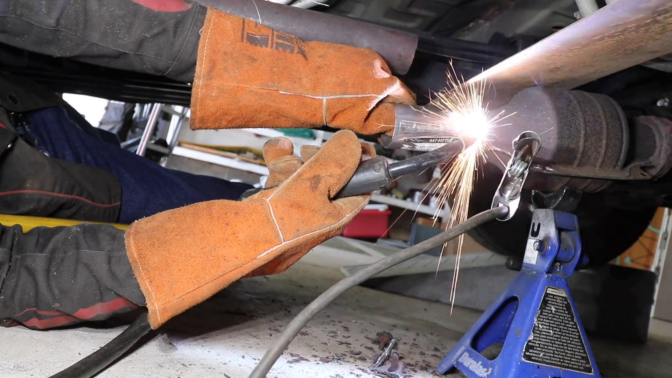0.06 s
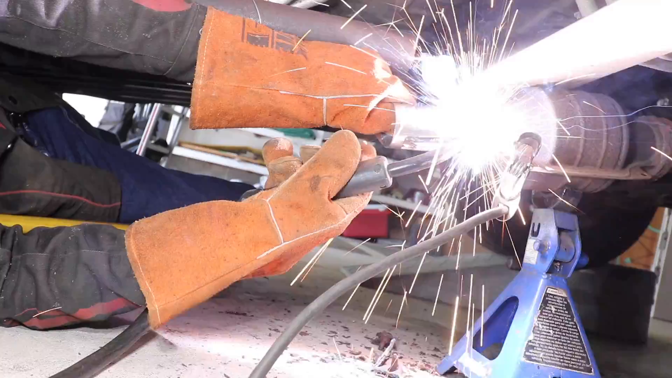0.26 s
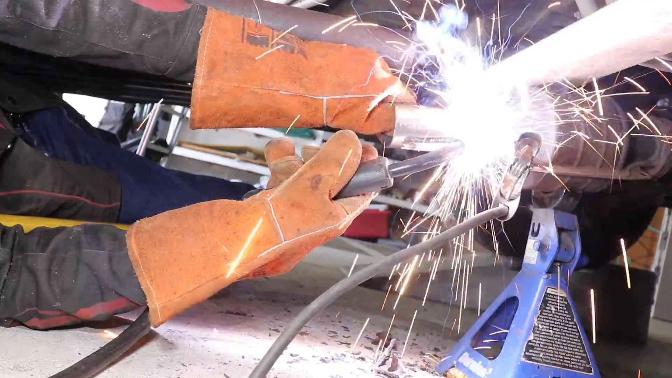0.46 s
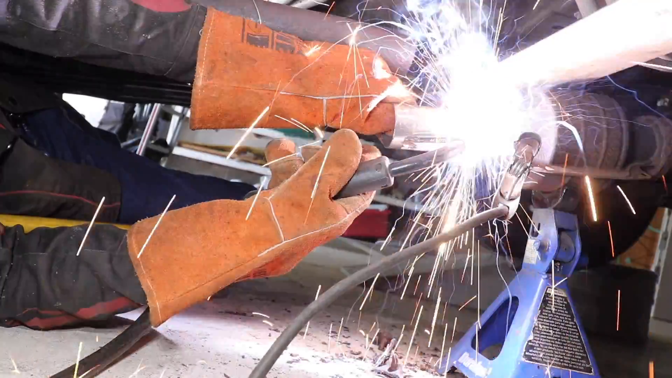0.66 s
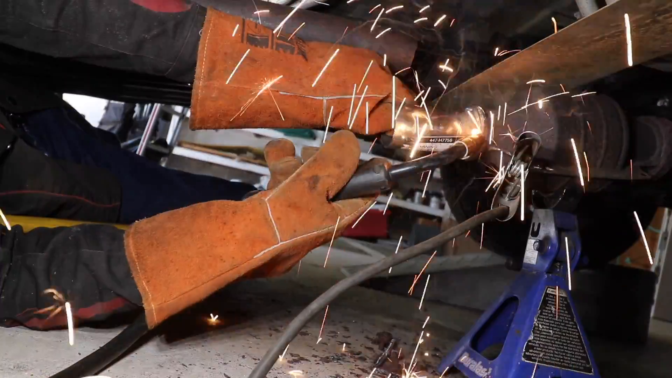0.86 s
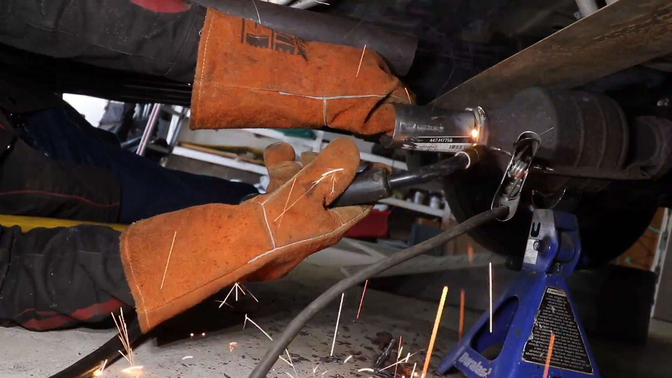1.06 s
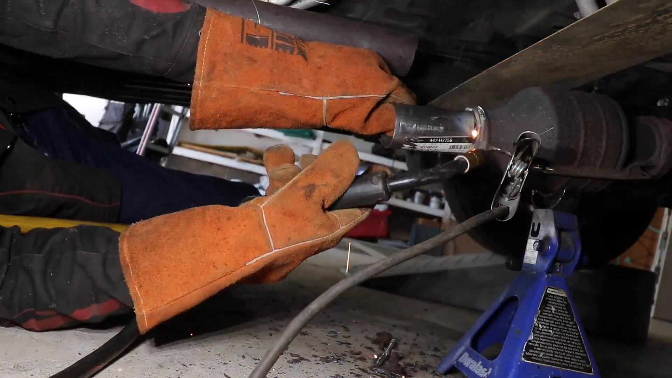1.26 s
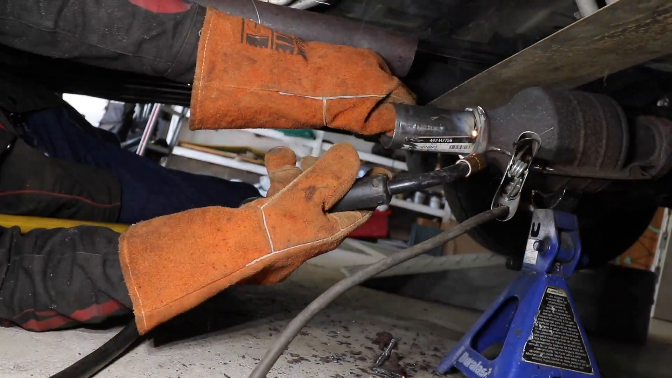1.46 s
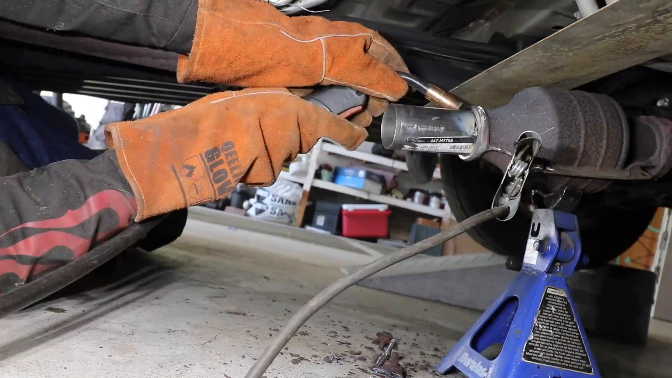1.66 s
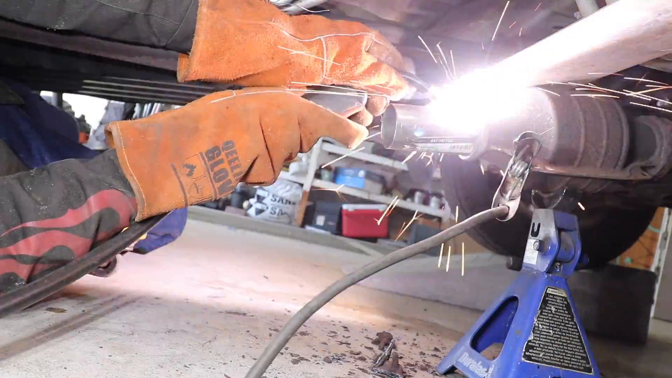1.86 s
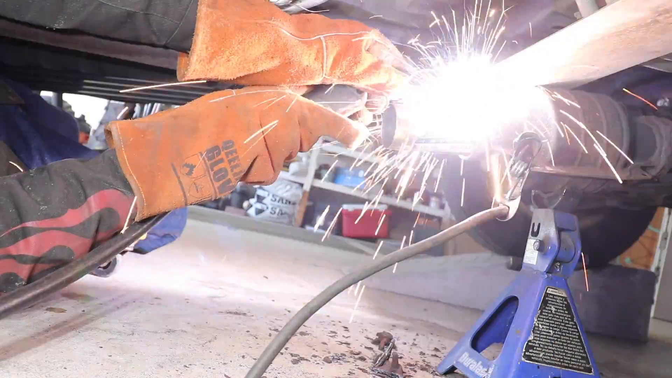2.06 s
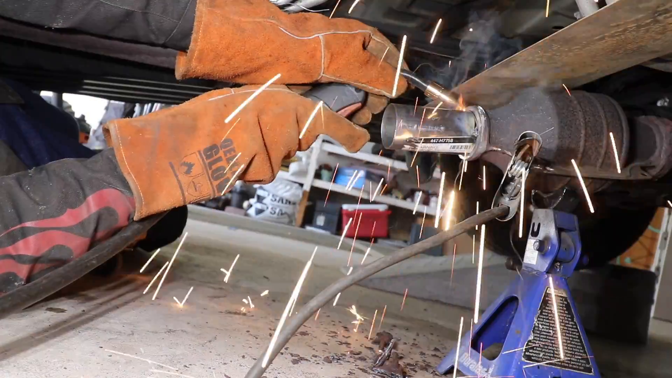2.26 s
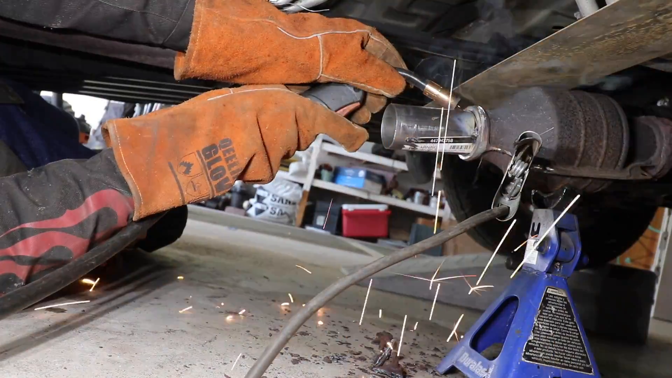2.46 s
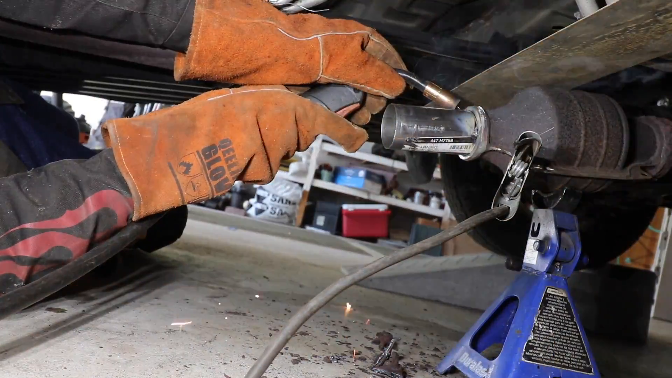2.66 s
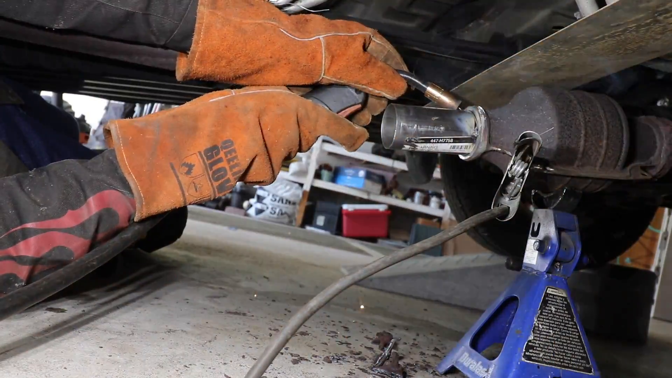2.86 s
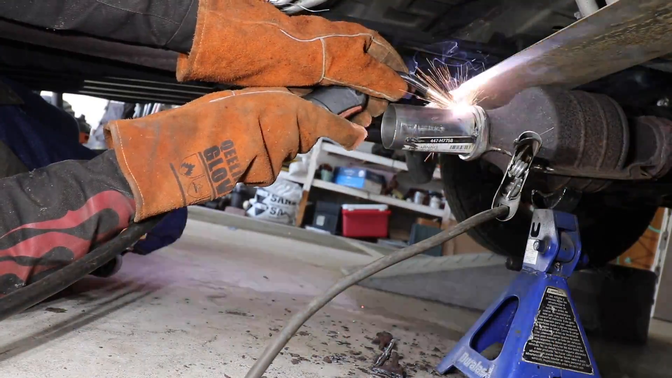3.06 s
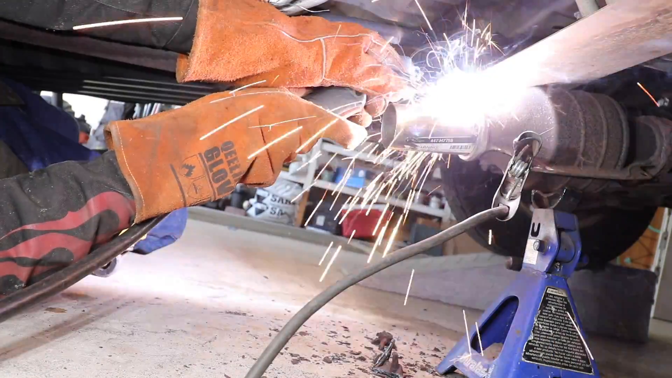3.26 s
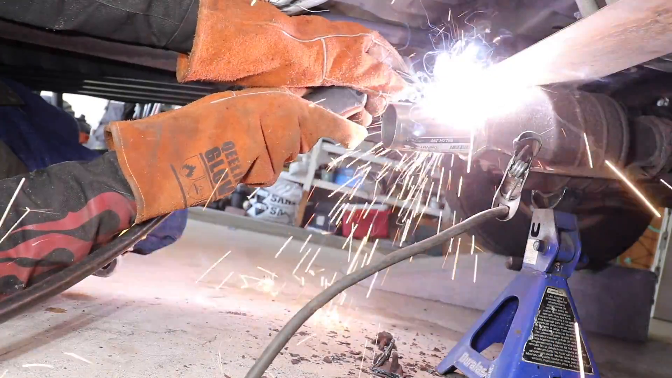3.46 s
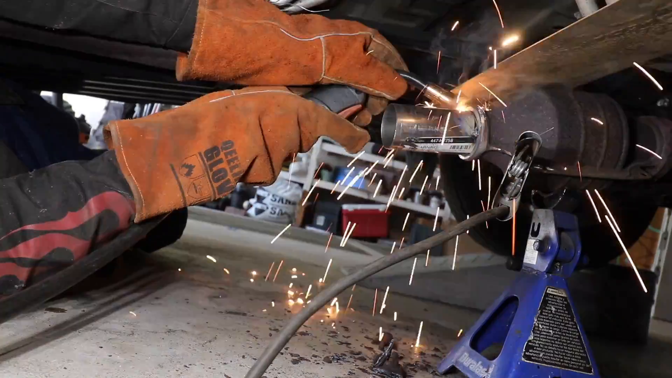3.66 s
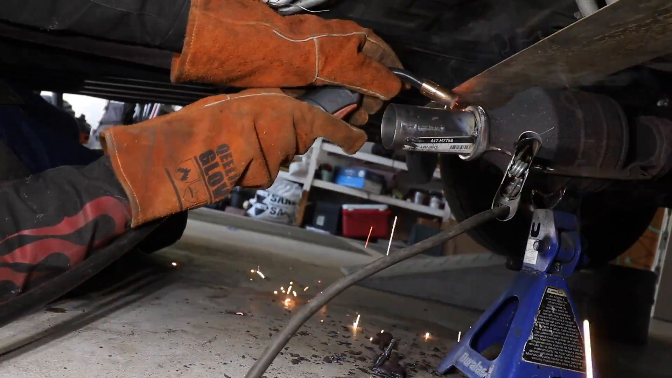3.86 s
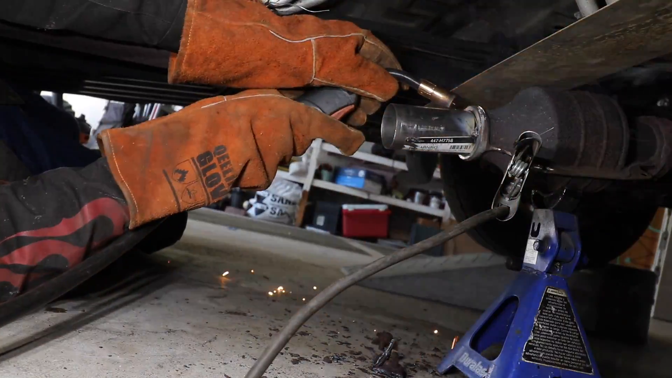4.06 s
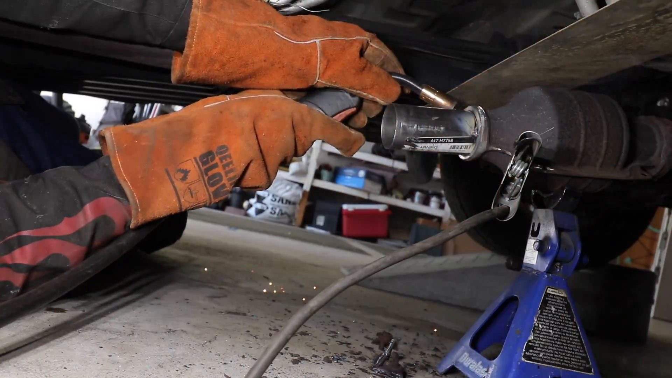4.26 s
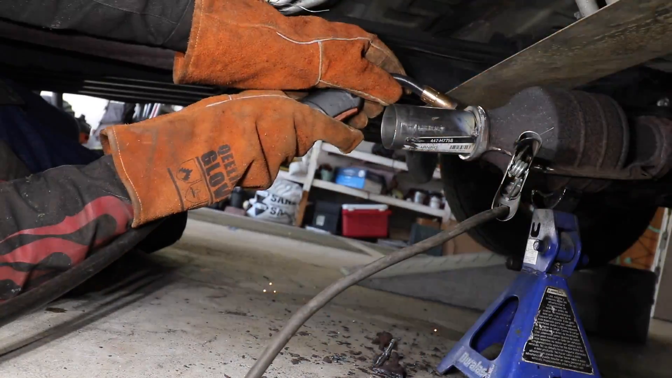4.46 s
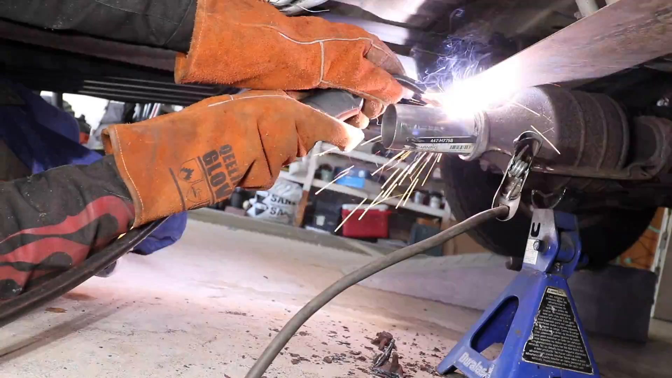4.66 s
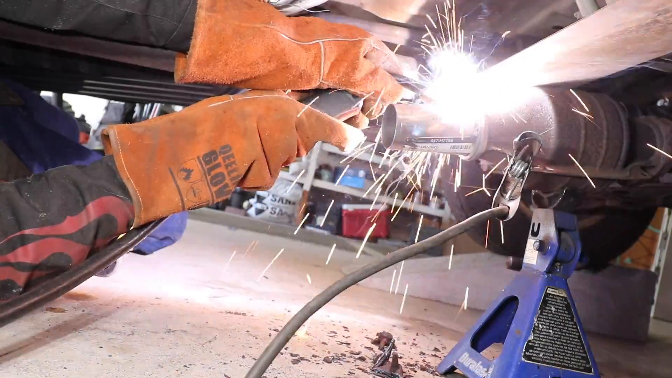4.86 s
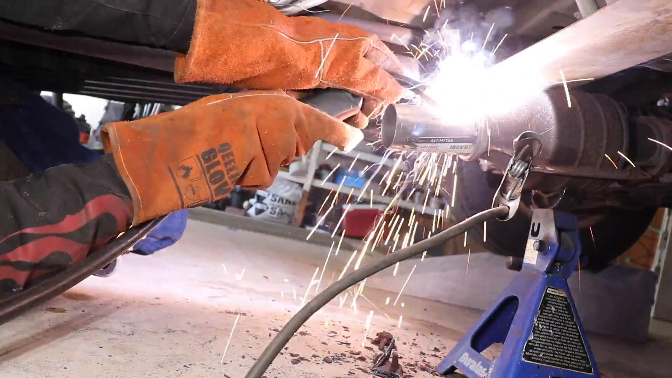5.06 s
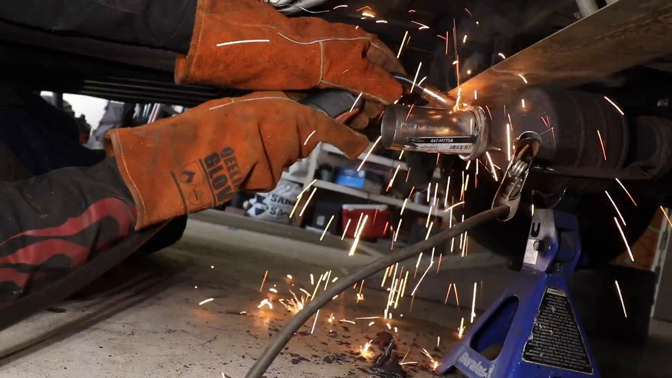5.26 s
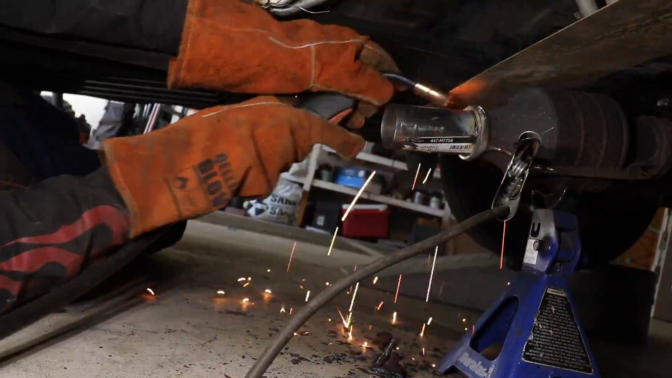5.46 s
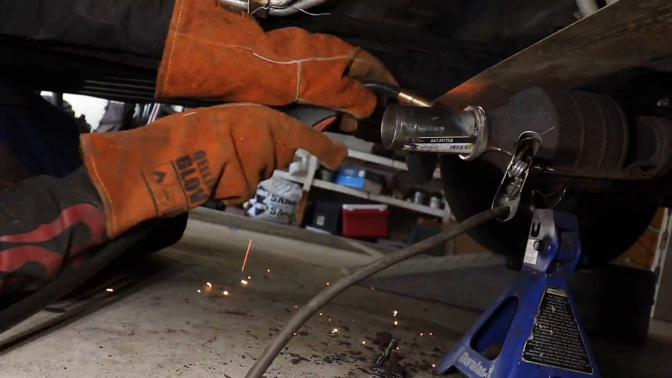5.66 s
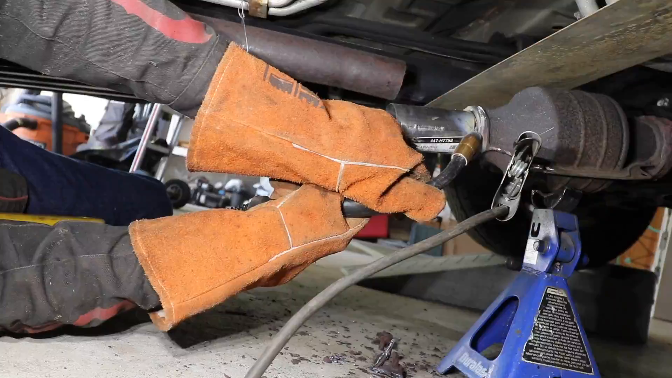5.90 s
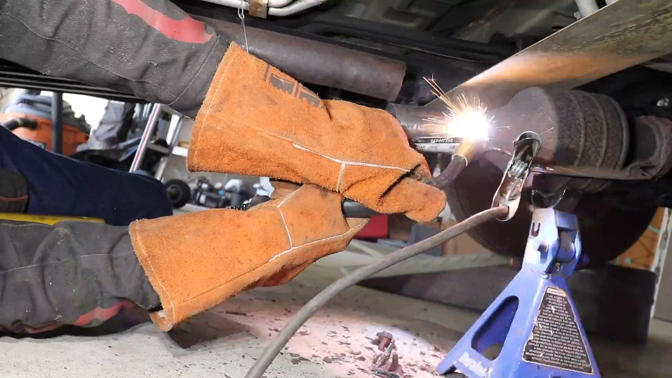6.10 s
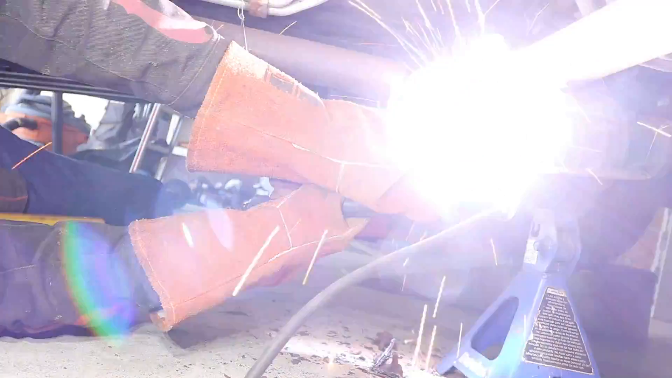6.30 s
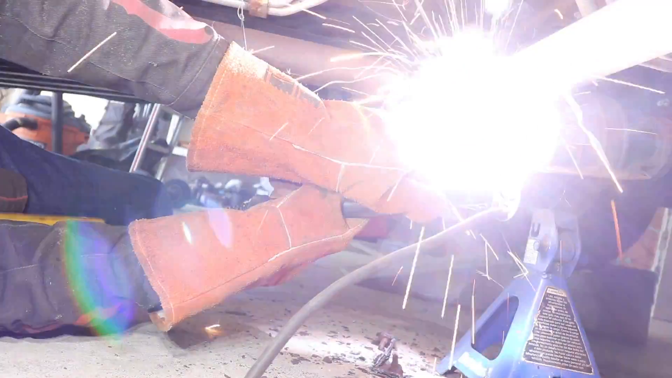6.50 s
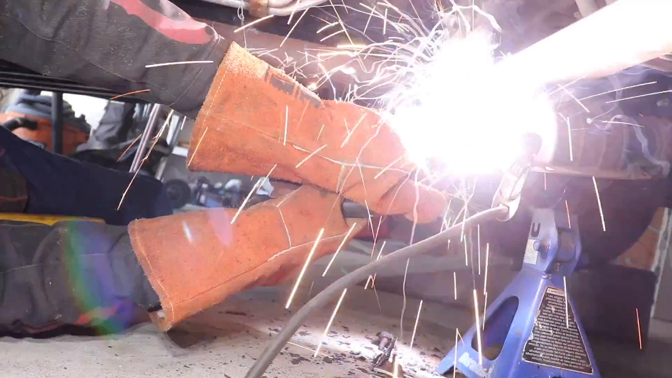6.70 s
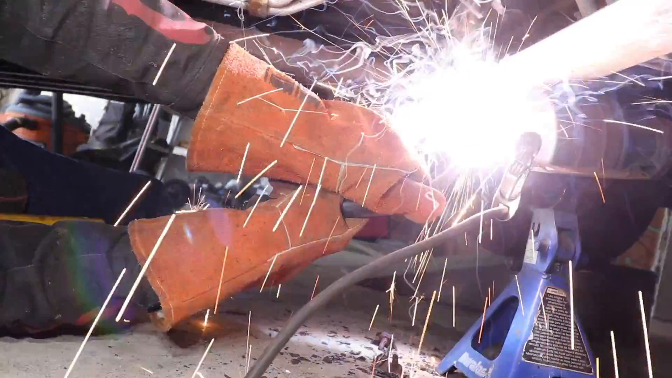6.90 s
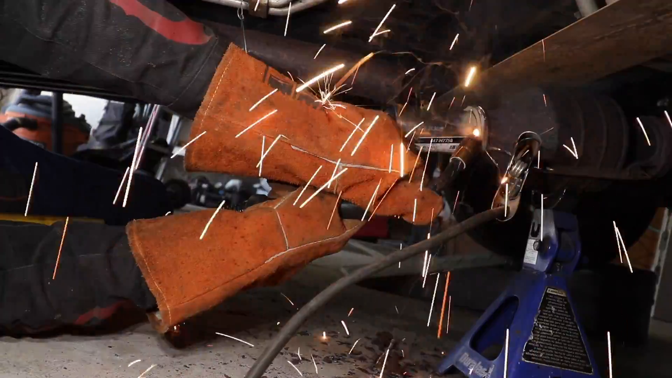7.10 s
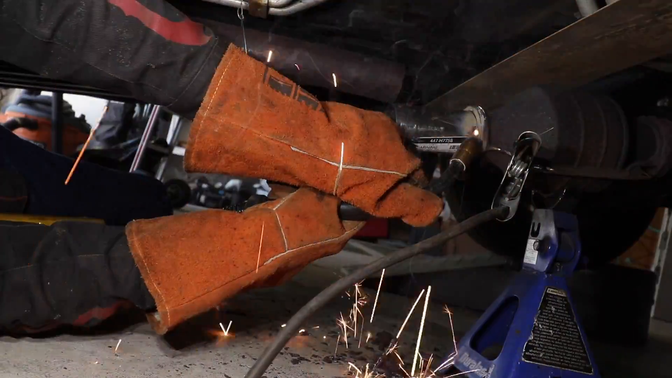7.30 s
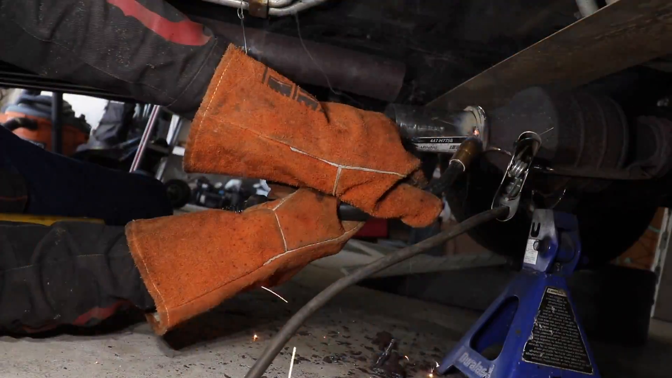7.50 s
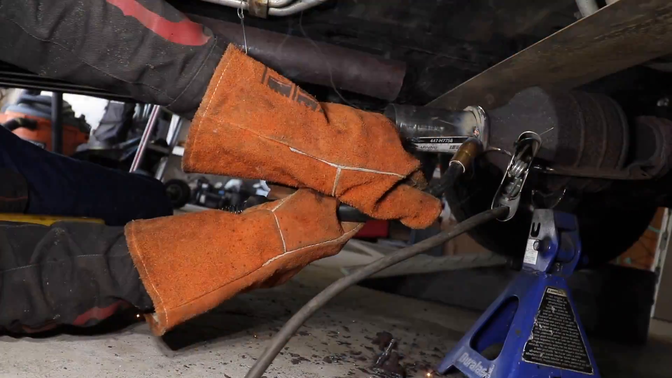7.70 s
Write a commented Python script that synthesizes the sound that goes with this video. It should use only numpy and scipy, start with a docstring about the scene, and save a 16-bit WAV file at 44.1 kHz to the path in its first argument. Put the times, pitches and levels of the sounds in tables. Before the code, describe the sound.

A welder's fan hums and a motor rumbles low in a garage. Five times the wire scratches on steel and an arc catches, with a bright, loud sizzle and snapping spits close to the microphone. The hum ducks under every burst and returns in the pauses, along with soft hiss and a few dry ticks. A light clank on the pipe follows the fourth weld. The space sounds tight, with little echo.

```python
"""A wire-feed welder tacks an exhaust pipe under a car, close by: five short arcs strike, spit and sizzle.
The wire scratches on cold steel, the arc fries in tiny bursts, and drops of metal short out and pop.
Between arcs, spatter ticks, hot metal fizzes and the torch knocks the pipe. Behind it all the welder's
fan hums and rushes and a motor rumbles in the garage; this backdrop dips at every strike and swells back."""
import sys
import numpy as np
from scipy import signal
from scipy.fft import rfft, irfft, next_fast_len
from scipy.io import wavfile
from scipy.ndimage import uniform_filter1d, map_coordinates

SR = 44100
rng = np.random.default_rng(int(sys.argv[2]) if len(sys.argv) > 2 else 0)


def unload_wav(signal):
    """Save mono or channel-first audio to the path in sys.argv[1] as 16-bit WAV at rate SR, clipped to [-1, 1]."""
    wavfile.write(
        sys.argv[1],
        SR,
        np.round(np.clip(np.atleast_2d(signal).T, -1, 1) * 32767).astype(np.int16),
    )


N = 341334

# before the first strike the hiss fades as the hum rises: t/s, hiss/dB, fizz/dB, hum change/dB
OPENING = [(0, -22, -29, -5.5), (0.087, -26, -51.5, 2)]
# how alike left and right are (1 = the same), for rushing air and for the arc: f/Hz, likeness
RUSH_LIKENESS = [(60, 0.69), (250, 0.86), (600, 0.68), (1500, 0.94), (4000, 0.044)]
ARC_LIKENESS = [(500, 1), (2500, 0.63), (5000, 0.46), (10000, 0.29), (15000, 0.16)]
# the weld is to the right: f/Hz, left over right/dB
WELD_BALANCE = [(60, 5.5), (150, -2.5), (380, 16), (950, -5), (2380, -1), (5980, -2.5), (15000, -5.5)]
WELD_LEFT_LATE_S = 5.7e-5


def amp(db):
    """Turn decibels into a factor to multiply by."""
    return 10 ** (np.asarray(db) / 20)


def unit(x):
    """Scale x to an average (rms) size of 1."""
    return x / np.sqrt(np.mean(x ** 2) + 1e-20)


def along(points, hz):
    """Read between (f/Hz, value) points, on a log frequency axis."""
    freqs, values = np.transpose(points)
    return np.interp(np.log(hz + 1), np.log(freqs + 1), values)


def curves(rows, **ends):
    """Join (t/s, values...) rows with straight lines, one curve per value column."""
    times, *columns = np.transpose(rows)
    return [np.interp(np.arange(N) / SR, times, column, **ends) for column in columns]


def wobble(rate):
    """A smooth random curve through `rate` points a second."""
    return map_coordinates(rng.standard_normal(int(N * rate / SR) + 4), [np.arange(N) * rate / SR])


def filtered(x, response):
    """Multiply each frequency in x by response(hz)."""
    size = next_fast_len(N + 8192)
    return irfft(rfft(x, size) * response(np.fft.rfftfreq(size, 1 / SR)), size)[..., :N]


def coloured(x, spectrum):
    """Shape x by (f/Hz, level/dB) points; white noise keeps its overall level."""
    return filtered(x, lambda hz: unit(amp(along(spectrum, hz))))


def placed(x, balance, left_late_s):
    """Set a direction with (f/Hz, left over right/dB) points and a tiny delay between the sides."""
    side = np.array([[.5], [-.5]])
    return filtered(x, lambda hz: amp(side * along(balance, hz))
                    * np.exp(-2j * np.pi * hz * side * left_late_s))


def stereo_noise(likeness):
    """White noise whose two sides agree as much as the (f/Hz, likeness) points say."""
    def shares(hz):
        angle = np.arccos(np.clip(along(likeness, hz), -1, 1)) / 2
        return np.array([np.cos(angle), np.sin(angle)])
    mid, side = filtered(rng.standard_normal((2, N)), shares)
    return np.array([mid + side, mid - side])


def bursts(times, db, t60):
    """Loudness curve of sudden bursts; t60 is the seconds each takes to fade by 60 dB."""
    powers = np.bincount(np.clip(np.asarray(times) * SR, 0, N - 1).astype(int), amp(db) ** 2, N)
    return np.sqrt(np.abs(signal.lfilter([1], [1, -amp(-120 / (t60 * SR))], powers)))


def dipped(full_db, deep_share, slow_share):
    """A backdrop level in dB: it drops under each arc, partly returns quickly, then climbs slowly."""
    # start/s, end/s, deep dip at start/dB, deep dip at end/dB, added slow dip/dB
    dips = [(0.089, 0.714, -13, -17.5, -9.5), (1.827, 2.162, -17.5, -15, -5), (3.093, 3.6, -17, -12, -7),
            (4.623, 5.155, -12, -11.5, -8), (6.138, 6.92, -9, -17, -12)]
    drop_s, return_s, climb_db_per_s = 0.0053, 0.11, 12.5
    jump_s = 5.767  # here the climb is cut short: full level at once
    t, deep_db, slow_db = np.arange(N) / SR, np.zeros(N), curves(OPENING)[2]
    for start, end, first_db, last_db, slow_dip_db in dips:
        fall = np.clip((t - start) / drop_s, 0, 1)
        release = np.clip(1 - (t - end) / return_s, 0, 1)
        deep_db += np.interp(t, [start, end], [first_db, last_db]) * fall * release
        climb_db = np.minimum(slow_dip_db + climb_db_per_s * np.maximum(t - end - return_s, 0), 0)
        jumped = (start < jump_s) & (t > jump_s)
        slow_db = np.where(t > start, fall * climb_db * ~jumped, slow_db)
    return full_db + deep_share * deep_db + slow_share * slow_db


def fan():
    """The fan's blades make a wavering hum and push rushing air through the welder's case."""
    rush_colour = [(150, -15), (250, -2.5), (423, -1.5), (498, -5.5), (609, -3.5), (708, -2), (812, -13.5),
                   (980, 1.5), (1070, -9.5), (1140, -2.5), (1580, -4.5), (1740, -11), (1980, -9.5),
                   (5000, -32.5), (6500, -29), (11000, -120)]  # f/Hz, level/dB
    hum_db = dipped(-19.5, deep_share=1.004, slow_share=0.93) + .7 * wobble(5)
    rush_db = dipped(-31.5, deep_share=0.42, slow_share=1.08) + .7 * wobble(5)
    blade_hz = 209.55 + 1.063 * wobble(8)
    phase = 2 * np.pi * np.cumsum(blade_hz) / SR + 0.022 * wobble(30)
    blades = np.sqrt(2) * np.sin(phase) + amp(-27) * np.sin(2 * phase)
    hum = amp(hum_db + 0.68 * wobble(28)) * blades * amp([[-1.1], [1.1]])  # louder on the right
    rush = amp(rush_db + 1.35 * wobble(15)) * coloured(stereo_noise(RUSH_LIKENESS), rush_colour)
    return hum + rush


def motor():
    """A motor drones at multiples of its turning speed, over a low rumble."""
    shaft_tones = [(2, -19.5), (3, -6.5), (4, -2.5), (5, -5), (6, 0), (12, -11)]  # multiple of the shaft speed, level/dB
    rumble_colour = [(20, -45), (40, -16), (80, -17), (160, -4.5), (200, 3.5), (240, -17), (300, -62)]  # f/Hz, level/dB
    shaft_hz = 24.02
    level_db = dipped(-33, deep_share=1, slow_share=1.04) + .7 * wobble(5)
    phase = 2 * np.pi * shaft_hz * np.arange(N) / SR
    drone = sum(amp(db + 2.9 * wobble(9)) * np.sin(multiple * phase + 1.44 * wobble(8))
                for multiple, db in shaft_tones)
    return amp(level_db) * (drone + coloured(stereo_noise(RUSH_LIKENESS), rumble_colour))


def hiss_and_fizz():
    """A smooth far hiss puffs up, mostly as an arc goes out, and hot metal adds a bright, patchy fizz."""
    # swells of hiss and of fizz: t/s, peak/dB, t60/s
    puffs = [(0.69, -41.5, 1.3), (1.75, -36, 0.83), (2.13, -41.5, 2.1), (3.575, -35, 0.83),
             (5.18, -32.5, 0.63), (5.66, -36, 0.46), (6.925, -40, 1.2), (7.42, -45, 0.78)]
    fizzes = [(0.69, -42, 0.93), (0.88, -55.5, 3.4), (1.1, -47.5, 0.76), (1.22, -63, 0.4), (2.13, -46, 3.3),
              (2.4, -59, 5.1), (3.575, -42, 1.05), (3.9, -65, 4.5), (4.17, -58, 4.5), (5.18, -44, 0.81),
              (5.4, -57, 9.9), (5.63, -58, 0.61), (6.925, -46.5, 2), (7.26, -45.5, 1.4), (7.42, -52, 0.69)]
    # their colours: f/Hz, level/dB
    hiss_colour = [(2500, -4.5), (3500, -6), (5000, -13.5), (8000, -11), (12000, -20), (16000, -39)]
    fizz_colour = [(4500, -13), (7000, -6.5), (9000, -3.5), (12000, -8), (15500, -12)]
    swells = [sum(bursts([s], [db], np.clip(t60, .05, 9)) for s, db, t60 in rows)
              for rows in (puffs, fizzes)]
    softened = uniform_filter1d(swells, size=1300, origin=649)  # each rises over about 30 ms
    puff_gain, fizz_gain = amp(curves(OPENING, right=-120)[:2]) + softened
    dip = amp(dipped(0, deep_share=0.22, slow_share=0))
    steady = amp(dipped(-45, deep_share=0.091, slow_share=0.76))
    hiss_noise, fizz_noise = rng.standard_normal((2, 2, N))
    hiss = np.hypot(steady, dip * puff_gain) * amp(2.2 * wobble(18)) * coloured(hiss_noise, hiss_colour)
    fizz = dip * fizz_gain * amp(1.8 * wobble(40)) * coloured(fizz_noise, fizz_colour)
    return hiss + fizz


def burn(rows):
    """Loudness of one burn along (t/s, level/dB) rows, with a quick rise before and a fall after."""
    rise_s, fall_s, edge_db = .005, 0.039, -22.5
    (start, first_db), (end, last_db) = rows[0], rows[-1]
    rows = [(start - rise_s, first_db + edge_db), *rows, (end + fall_s, last_db + edge_db)]
    return amp(curves(rows, left=-120, right=-120)[0])


def arc_loudness():
    """The wire flares, then the arc holds: loudness curves of the high sizzle and of the low part."""
    arcs = [
        [(0.218, -24), (0.26, -29), (0.31, -21), (0.35, -27), (0.44, -24), (0.54, -26), (0.6, -28.5),
         (0.66, -27), (0.712, -30.5)],
        [(1.92, -22), (1.97, -18.5), (2.01, -24.5), (2.05, -21), (2.09, -21.5), (2.135, -28.5)],
        [(3.1, -19.5), (3.15, -22), (3.2, -20.5), (3.26, -23), (3.44, -23.5), (3.55, -18.5), (3.585, -22)],
        [(4.635, -19), (4.66, -22), (4.83, -22.5), (5.04, -23.5), (5.13, -21.5), (5.195, -29)],
        [(6.21, -23), (6.25, -26), (6.3, -24), (6.42, -24), (6.54, -27), (6.6, -27), (6.66, -30), (6.78, -25),
         (6.84, -28), (6.9, -24.5), (6.942, -28.5)],
    ]  # one list per arc, from catching to going out: t/s, sizzle/dB
    low_parts = [-9, -7.5, -8.5, -8, -9.5]  # one per arc: low part over sizzle/dB
    flares = [(0.095, 0.15, -20, -32.5, -8), (0.154, 0.2, -33, -41.5, -1.5), (1.819, 1.92, -24.5, -36, -4),
              (3.068, 3.09, -26.5, -20.5, -2), (4.589, 4.637, -30, -24, -4.5), (6.048, 6.085, -22, -29, -2),
              (6.073, 6.16, -30, -32.5, 4)]  # start/s, end/s, first level/dB, last level/dB, low part over sizzle/dB
    burns = [(burn(rows), low_db) for rows, low_db in zip(arcs, low_parts)]
    burns += [(burn([(start, first_db), (end, last_db)]), low_db)
              for start, end, first_db, last_db, low_db in flares]
    return np.max([(gain, gain * amp(low_db)) for gain, low_db in burns], axis=0)


def spits(sizzle, strays=180):
    """Drops of metal short out and burst: set spits, plus random strays that rise above the sizzle."""
    drops = [(0.0871, 2.5, -17), (0.1315, -7, -18), (0.1552, 0, -12.5), (0.213, -7, -22),
             (0.2809, -12.5, -15), (0.3143, -13, -16), (0.3208, -14.5, -12), (0.3602, -20, -2.5),
             (0.4285, -16, -7), (0.4684, -22, -24), (0.5221, -17, -8), (0.543, -17, -9), (0.5526, -12, -21),
             (0.5797, -20, -10), (0.6226, -20, -8), (0.6845, -12.5, -16.5), (1.8238, -20, -5),
             (1.8362, 4, -7.5), (1.8732, -15, -19), (1.9176, -17, -15), (1.934, -12, -9),
             (1.9704, -15, -18), (2.0283, -11, -20), (2.0802, -22, -16), (2.1412, -11.5, -11),
             (3.0749, -8, -11), (3.0983, 0.5, -13), (3.1198, -6.5, -10), (3.1357, -10, -15),
             (3.1517, -18, -26), (3.3393, -9, -20), (3.3727, -28, -13), (3.455, -9, -14), (4.5999, -14, -3),
             (4.6288, 3, -15), (4.6627, -12, -22), (4.7001, -12, -16), (4.7186, -11, -20),
             (4.7949, -14, -13), (4.8054, -11, -10), (4.8618, -9, -18), (4.9136, -19, -13),
             (4.9361, -14, -10), (5.0399, -15.5, -6), (5.0713, -10, -12), (5.0992, -22, -8),
             (5.1391, -23, -11), (5.197, -24, -8), (6.1252, -10, -9), (6.1377, 4.5, -9), (6.207, -16.5, -9),
             (6.219, -18, -17), (6.2255, -10.5, -13), (6.2619, -10, -14), (6.3033, -22, -17),
             (6.3322, -13, -8), (6.3981, -12.5, -23), (6.4555, -12.5, -13), (6.4719, -18, -18),
             (6.5438, -15, -17), (6.5617, -14, -21), (6.6286, -12.5, -11), (6.6385, -10, -20),
             (6.7363, -13.5, -27), (6.7887, -13, -18), (6.7987, -18, -19), (6.8615, -14, -26),
             (6.8715, -12.5, -15), (6.9049, -15, -9.5)]  # t/s, peak/dB, low part over peak/dB
    when, strength = rng.random((strays, 2)).T
    stray_s = when * (N - 1) / SR
    stray_db = 20 * np.log10(sizzle[(stray_s * SR).astype(int)]) + 2.5 - 2 * np.log(1 - strength)
    stray_low_db = np.full(strays, -11)
    return np.transpose([*drops, *zip(stray_s, stray_db, stray_low_db)])


def crackle():
    """Loudness of the frying: many weak bursts, few strong, a quarter in step with the mains power."""
    pulse_hz = 120  # the rectified mains pulses twice per cycle
    when, chance, strength = rng.random((5000, 3)).T
    times = when * N / SR
    times = np.where(chance < .25, np.round(times * pulse_hz) / pulse_hz, times)
    return unit(bursts(times, 14 * strength ** 3, t60=.012))


def arc():
    """The arc fries and spits, with a dull thud under each spit; the car's underside colours it."""
    # torch below the pipe, then on top; each has a low and a high band with a gap between: f/Hz, level/dB
    below_colours = [(470, -48), (800, -15), (972, -20.5), (1200, -11.5), (1510, -10.5), (2170, -2),
                     (3040, -13), (3560, -5), (4800, -19), (6240, -14.5), (10600, -120)], [(2820, -54),
                     (4800, -41), (5180, -11.5), (6930, -2.5), (8230, 8), (8790, -1), (9570, 5),
                     (11000, -1.5), (11900, 0), (14000, -3.5), (16000, -3)]
    top_colours = [(410, -24), (700, -23), (765, -15), (966, -4.5), (1110, -11), (1290, 3), (2060, -5),
                   (3770, 1), (4800, -22.5), (6240, -34), (10600, -120)], [(2820, -77), (4800, -24),
                   (5530, -11.5), (6900, -8.5), (7710, -1), (7940, -3.5), (9010, -6.5), (12100, -9.5),
                   (13500, -10), (15200, -21), (16000, -7)]
    thud_colour = [(150, -40), (330, -4), (600, -3), (950, -1), (1600, -25), (3000, -120)]  # f/Hz, level/dB
    sizzle, body = arc_loudness()
    spit_s, peak_db, low_db = spits(sizzle)
    frying = crackle()
    snap = bursts(spit_s, peak_db, t60=.007)
    snap_tail = bursts(spit_s, peak_db - 8, t60=.025)
    high_fry = sizzle * amp(1.1 * wobble(22)) * unit(1 + frying)
    low_fry = body * amp(1.5 * wobble(15)) * unit(1.1 + frying)
    high = np.sqrt(high_fry ** 2 + snap ** 2 + snap_tail ** 2)
    low = np.hypot(low_fry, bursts(spit_s, peak_db + low_db, t60=.022))
    noise, t = stereo_noise(ARC_LIKENESS), np.arange(N) / SR
    on_top = (t > 1.7) & (t < 5.5)  # the middle three arcs
    thuds = bursts(spit_s, peak_db - 27.5, t60=0.034)
    sound = coloured(thuds * stereo_noise(RUSH_LIKENESS), thud_colour)
    for (dull, bright), when in ((below_colours, ~on_top), (top_colours, on_top)):
        sound += coloured(when * low * noise, dull) + coloured(when * high * noise, bright)
    return placed(sound, WELD_BALANCE, WELD_LEFT_LATE_S)


def spatter_ticks():
    """Specks of spattered metal make short, dry ticks between the arcs."""
    ticks = [(0.8144, -37), (1.143, -40), (1.7623, -34), (2.7397, -35.5), (3.9692, -43), (4.2198, -46),
             (5.6389, -26), (5.7644, -31), (7.2788, -25), (7.3244, -39), (7.3554, -41), (7.5537, -35.5),
             (7.6044, -42)]  # t/s, peak/dB
    tick_colour = [(470, -29.5), (800, -10), (2210, -10.5), (6410, -16.5), (7360, -11), (11600, -14),
                   (14800, -19), (16000, -60.5)]  # f/Hz, level/dB
    gain = bursts(*np.transpose(ticks), t60=0.037)
    return coloured(gain * stereo_noise([(1000, 0.13)]), tick_colour)


def wire_scratches():
    """The wire scratches on cold steel before the arc catches: harsh, wide bursts of noise."""
    scratches = [(1.8257, -11), (3.0747, -14.5), (4.6006, -11.5), (4.6086, -18.5), (6.0514, -14)]  # t/s, peak/dB
    scratch_colour = [(470, -41), (800, -7.5), (1390, 7), (2730, -14), (3740, 2.5), (8230, -2.5),
                      (16000, -14)]  # f/Hz, level/dB
    gain = bursts(*np.transpose(scratches), t60=0.067)
    sound = coloured(gain * stereo_noise(ARC_LIKENESS), scratch_colour)
    return placed(sound, WELD_BALANCE, WELD_LEFT_LATE_S)


def pipe_knocks():
    """The torch knocks the pipe: dull clanks whose ringing tones flutter as they die."""
    knocks = [(5.639, -28.5), (5.724, -43.5)]  # t/s, level/dB
    pipe_tones = [(1530, 0, 0.19), (1900, -10, 0.27), (2330, 4, 0.14), (3140, -0.5, 0.24), (4540, -2, 0.13),
                  (6130, -15, 0.22), (6600, -14, 0.28)]  # f/Hz, level/dB, t60/s
    clanks, t = np.zeros(N + SR), np.arange(SR // 4) / SR
    for start, knock_db in knocks:
        for hz, tone_db, t60 in pipe_tones:
            flutter = unit(uniform_filter1d(rng.standard_normal(len(t)), size=130))
            fade = amp(knock_db + tone_db - 60 * t / t60)
            clanks[round(start * SR):][:len(t)] += fade * flutter * np.sin(2 * np.pi * hz * t)
    return clanks[:N]


def echoes(x, t60):
    """Many reflections blur x into a fading tail."""
    t = np.arange(SR // 2) / SR
    tail = rng.standard_normal((2, len(t))) * amp(-60 * t / t60)
    return signal.fftconvolve(x, tail / np.linalg.norm(tail[0]), axes=1)[:, :N]


def scene():
    """The close welding and its echoes, over the fan, motor and hiss."""
    welding = wire_scratches() + arc() + pipe_knocks() + spatter_ticks()
    under_car = amp(-7) * echoes(welding, t60=.03)  # between floor and car
    garage = amp(-29) * echoes(welding, t60=.3)
    machines = placed(fan() + motor(), [(1000, 0.22)], left_late_s=-0.00018)
    return welding + under_car + garage + machines + hiss_and_fizz()


def record(dry):
    """Round off the loudest spits near full scale and cut the very highest treble."""
    top_hz = 15800
    rounded = dry / (1 + np.abs(dry) ** 6) ** (1 / 6)
    return np.clip(filtered(rounded, lambda hz: amp(-40 * np.clip((hz - top_hz) / 500, 0, 3))), -1, 1)


dry = scene()
out = record(dry)
unload_wav(out)
```